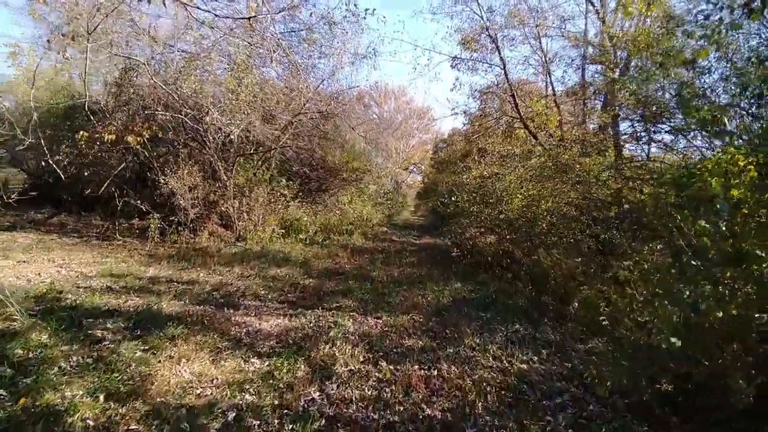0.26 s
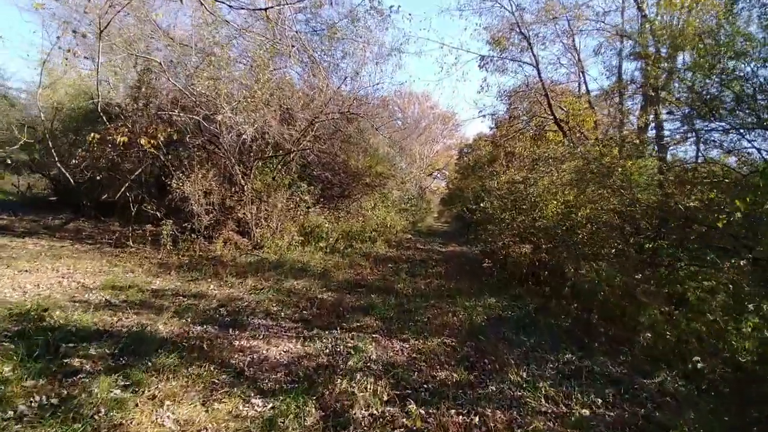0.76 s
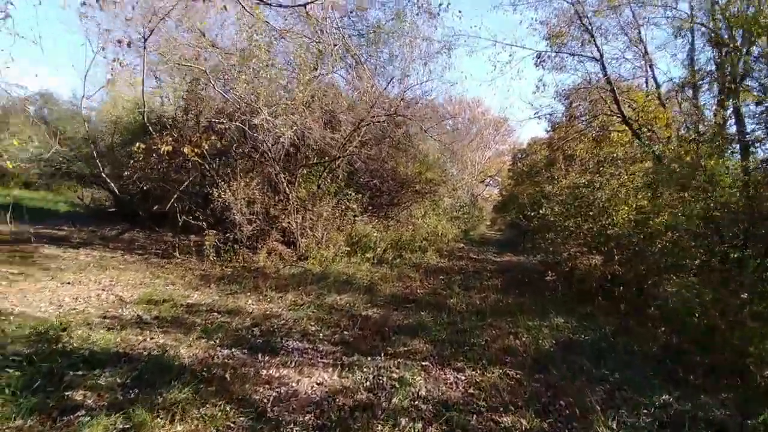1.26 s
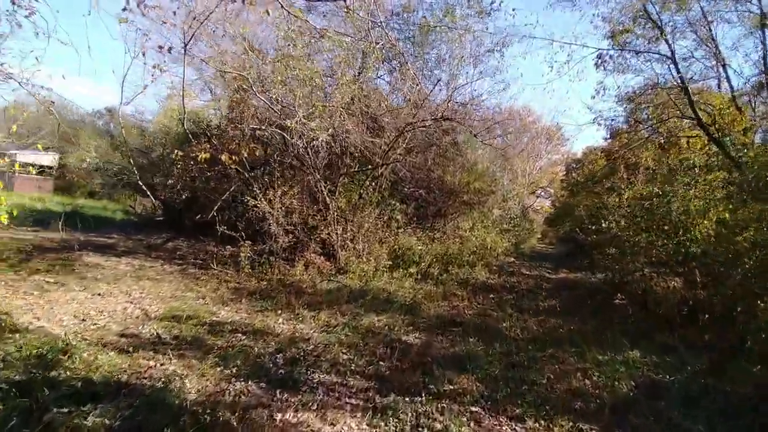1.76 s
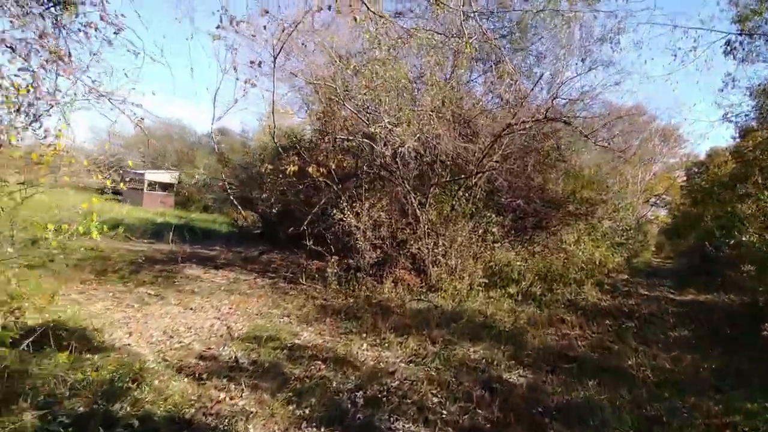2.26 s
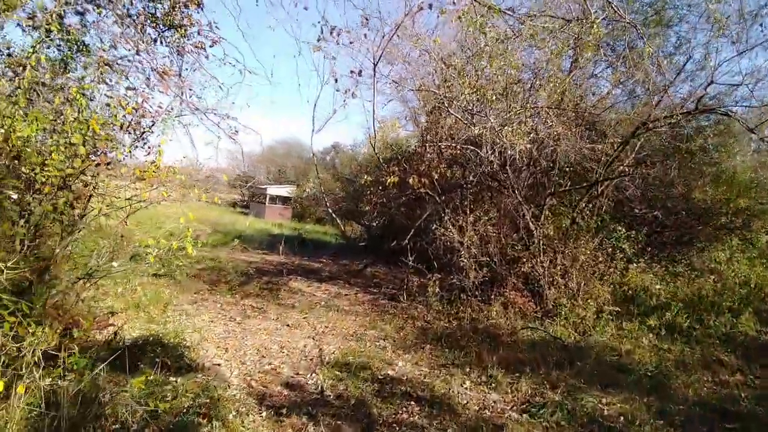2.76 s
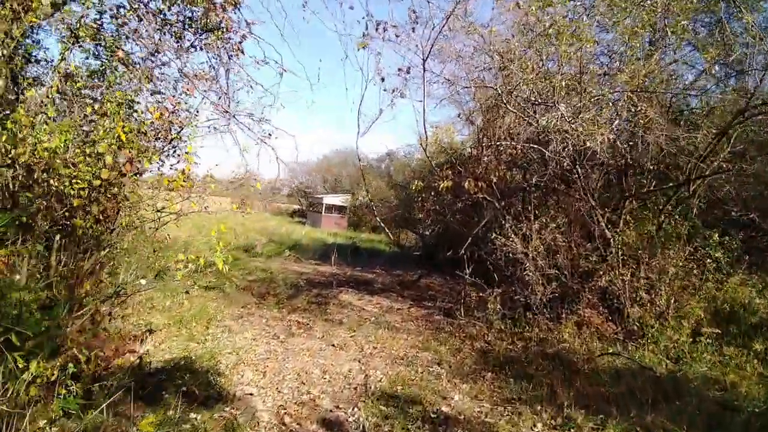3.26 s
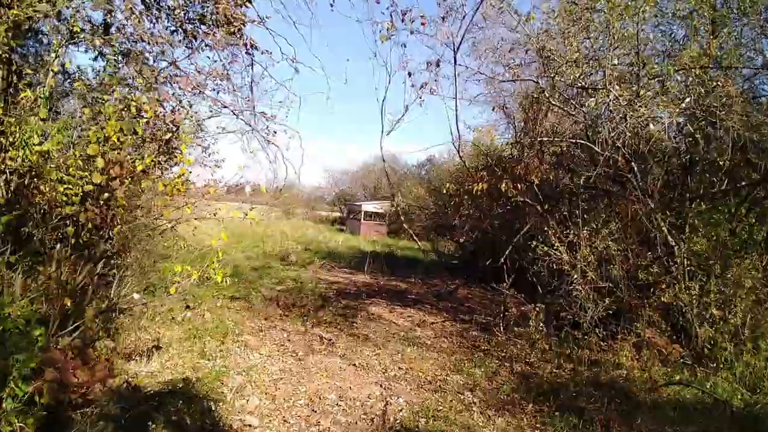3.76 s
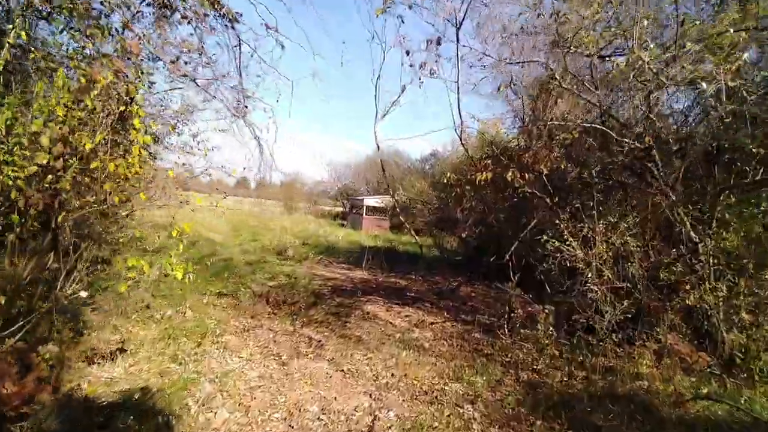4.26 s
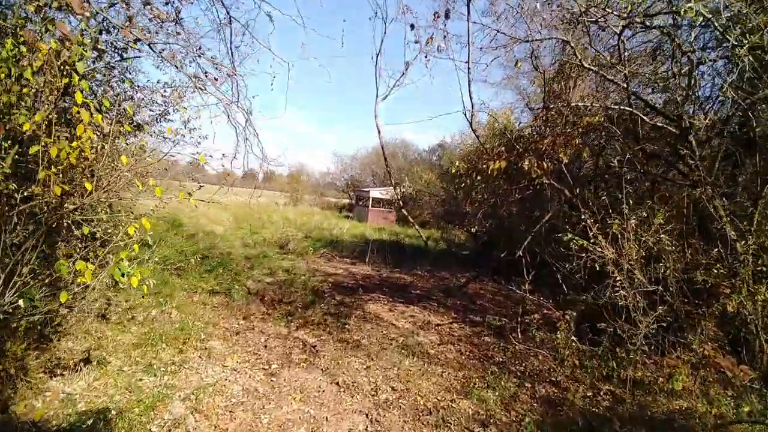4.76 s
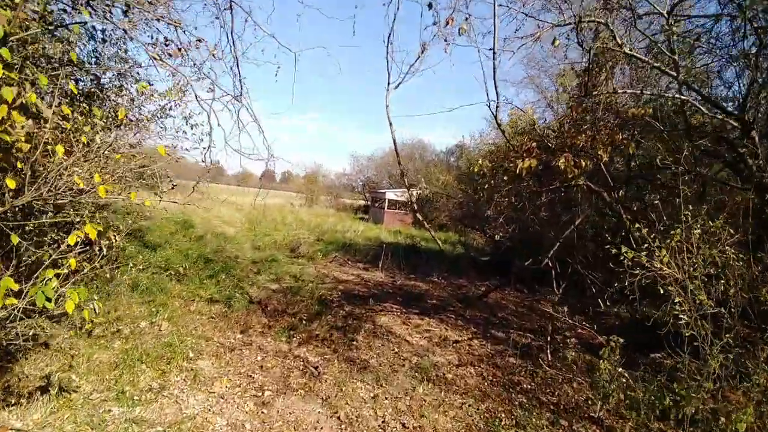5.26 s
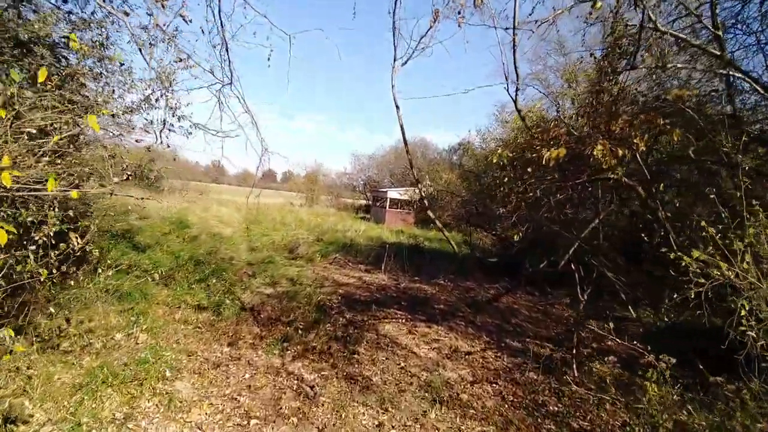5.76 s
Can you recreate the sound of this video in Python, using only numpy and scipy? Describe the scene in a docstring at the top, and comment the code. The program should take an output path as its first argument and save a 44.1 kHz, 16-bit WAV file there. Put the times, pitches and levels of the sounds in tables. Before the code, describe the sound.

Footsteps crunch steadily through dry fallen leaves on an outdoor trail, with small stems snapping over a faint breeze.

```python
"""Footsteps crunch through dry fallen leaves on an outdoor trail, about ten steps.
Each foot presses the soil, scuffs the litter and breaks countless leaves, each with a tiny click.
Now and then a stem snaps, and the soft ground takes the walker's weight with a dull thud.
A light breeze rumbles on the two microphone openings (ports), over very quiet open air."""
import sys
import numpy as np
from scipy import signal
from scipy.fft import rfft, irfft, next_fast_len
from scipy.io import wavfile

SR = 44100
rng = np.random.default_rng(int(sys.argv[2]) if len(sys.argv) > 2 else 0)


def store_pcm(level_fs):
    """Save levels as 16-bit WAV."""
    pcm = np.round(np.clip(level_fs, -1, 1) * 32767).astype(np.int16)
    wavfile.write(sys.argv[1], SR, np.atleast_2d(pcm).T)


N = 264597

# Levels in the tables are relative: the functions add their own gains.
# each step presses twice, heel then forefoot:
# start_s, attack_s, hold_s, release_s, leaves_db, sole_db, soil_db
FOOT_PRESSES = [(-0.02, .02, .01, 0.36, -39.5, -53, -59), (0.145, .04, 0.054, 0.1053, -38.3, -56.5, -59.5),
                (0.478, .125, .012, .125, -30, -44, -50), (0.682, .03, .027, 0.0458, -32.5, -44.5, -48.5),
                (1.08, .03, .05, 0.2, -45.5, -57.5, -66.5), (1.215, .09, .05, .07, -39.5, -54.5, -53.5),
                (1.53, .095, .04, .08, -39.5, -46.5, -52.5), (1.702, .028, .06, 0.16, -32, -42, -47.5),
                (2.304, .018, .032, 0.1449, -35.5, -47.5, -56),
                (2.402, .035, .005, 0.1462, -36.5, -56, -57), (2.868, .09, .02, 0.25, -41.5, -54.5, -58),
                (2.991, .028, .02, 0.08, -37, -60, -55), (3.484, .024, .035, 0.1552, -39.5, -54, -61.5),
                (3.597, .06, .045, 0.1, -39, -51, -56.5), (4.0, .048, 0.095, 0.31, -41, -55.5, -59),
                (4.209, .05, .015, 0.14, -40.5, -55, -54.5), (4.79, .075, .02, 0.08, -37.5, -49, -50.5),
                (4.939, .04, .015, 0.12, -43.5, -57.5, -60.5), (5.39, .11, .03, -0.19, -49, -56, -56),
                (5.525, .045, .005, 0.1, -40.5, -48.5, -54.5)]
# the swinging foot brushes the leaves: start_s, hold_s, leaves_db, sole_db
FOOT_BRUSHES = [(0.306, .135, -56, -64.5), (0.78, .12, -52.5, -64), (1.392, .12, -61, -64),
                (1.883, .02, -45, -60), (1.978, .045, -50.5, -63), (2.1, .07, -63.5, -73.5),
                (2.585, .04, -47.5, -58.5), (2.7, .02, -66, -69), (2.828, .01, -60, -67),
                (3.095, .015, -46.5, -64), (3.215, .055, -52.5, -61), (3.385, .045, -56, -66),
                (3.79, .12, -57, -64.5), (4.331, .025, -43.5, -56.5), (4.422, .085, -46.5, -63),
                (4.649, .1, -61.5, -66), (5.059, .135, -54.5, -65), (5.31, .02, -53, -63),
                (5.68, .045, -57, -62.5)]
# trodden leaves keep ticking until the walker pauses: leaves_db, sole_db, soil_db
TICKING_DB = [-67, -74, -75]
# how brittle the leaves are along the trail: time_s, treble_db
LEAF_CRISPNESS = [(0.0, -2), (0.55, -8.5), (0.72, -5), (1.0, -8), (1.28, -3.5), (1.75, -6.5), (1.93, -0.5),
                  (2.15, -9.5), (3.0, -2.5), (3.3, -16), (3.6, -6), (3.9, -11), (4.1, -2.5), (4.38, -0.5),
                  (4.6, -9), (5.1, -3.5), (5.7, 2.5)]
# tone of crushed leaves: frequency_hz, level_db
LITTER_TONE = [(170, -23.5), (290, -24.5), (430, -10.5), (580, -11), (950, -11), (2000, -13), (3100, -10),
               (4200, -2.5), (6400, 1.5), (8000, 2), (10500, -8), (13700, -16.5), (14800, -9),
               (15800, -10.5)]
# stems and stiff leaves that snap: time_s, level_db, pitch_hz, settle_s
STEM_SNAPS = [(0.01, -11, 6160, .007), (0.248, -12, 7650, 0.005), (0.2621, -22.5, 8600, 0.0056),
              (0.2745, -20, 8060, 0.0068), (0.443, -33.5, 8800, 0.008), (1.089, -38, 6240, .012),
              (1.106, -29, 3540, .015), (1.28, -23.5, 9300, .006), (1.305, -16, 8750, .006),
              (1.3735, -19, 7200, 0.0041), (1.722, -15, 6240, 0.0051), (2.0468, -31.5, 3600, .007),
              (2.1096, -26, 8100, .006), (2.158, -43, 1910, 0.0073), (2.4432, -15, 8050, .006),
              (2.505, -23, 9400, .006), (2.5453, -24.5, 9500, 0.0065), (2.7818, -41.5, 1680, 0.0045),
              (2.782, -35, 6030, 0.0045), (2.894, -23, 7850, 0.01), (3.0485, -18.5, 7000, .006),
              (3.102, -36.5, 7000, .005), (3.1193, -19.5, 8500, 0.005), (3.1662, -32, 8300, .006),
              (3.232, -31.5, 5500, 0.015), (3.2612, -27.5, 6650, 0.0075), (3.322, -39.5, 2250, .006),
              (3.364, -30, 4740, 0.042), (3.7072, -19, 8000, 0.0052), (3.8639, -28, 7540, .006),
              (3.9047, -34, 7600, .004), (3.9954, -29, 5100, 0.021), (4.163, -22, 10000, .006),
              (4.3066, -21, 7400, 0.0055), (4.355, -20, 8450, .006), (4.38, -22, 9500, .006),
              (4.615, -42, 11300, 0.0053), (4.9902, -20, 8900, .006), (5.336, -35, 5970, .012),
              (5.407, -32.5, 2920, 0.012), (5.708, -35, 1860, .013), (5.709, -29, 6600, .007),
              (5.7471, -34, 8520, .006), (5.793, -37, 1485, 0.0053), (5.927, -44, 10370, .006),
              (5.931, -51, 1220, 0.014)]
# the weight comes down on the ground: start_s, level_db
GROUND_THUDS = [(0.185, -60), (0.695, -59), (1.343, -55), (1.795, -63), (3.018, -56), (3.689, -64),
                (4.12, -54.5), (4.264, -60), (4.675, -71),         (4.83, -46), (4.879, -55.5),
                (5.521, -54.5)]
# a light breeze that drops as the path turns: time_s, level_db
BREEZE_LEVEL = [(0.0, -78), (1.0, -82), (1.8, -79), (3.0, -87.5), (6.0, -88.5)]
# gusts on the ports: peak_time_s, level_db, width_s
BREEZE_GUSTS = [(0.1, -58.5, .035), (0.23, -65.5, .06), (0.68, -60.5, 0.055), (1.2, -77.5, 0.11),
                (1.86, -66.5, .05), (2.01, -71, 0.025), (2.42, -70, 0.066), (4.86, -79, 0.037),
                (5.52, -74.5, .04)]
# tone of buffeting air: frequency_hz, level_db
BREEZE_TONE = [(20, -42), (45, -8), (75, -2), (110, 2.5), (150, -13.5), (260, -23)]
# tone of distant open air: frequency_hz, level_db
AIR_TONE = [(30, -46), (70, -10), (118, 1), (160, -1.5), (500, -7.5), (1000, -6.5), (2000, -16),
            (3200, -8.5), (7000, -11.5), (15800, -27)]
# how much louder the left port is: frequency_hz, left_minus_right_db
PORT_BALANCE = [(70, 10.3), (200, 0), (650, 0.0), (1000, 3.3), (1450, 2.8), (1950, 9.3), (2400, 1.6),
                (3000, 0.9), (5200, -0.5), (7000, 3.9), (8500, 7.5), (10500, 8.8), (13600, 5.7),
                (14800, 7.7)]
# how alike the two ports sound: frequency_hz, likeness (0 to 1)
PORT_LIKENESS = [(60, .2), (200, 0.66), (550, 1), (1150, 0.49), (1900, 0.67), (2400, 0.26), (3150, 0.93),
                 (3650, 0.64), (4400, 0.74), (6500, 0.78), (9000, 0.14), (12000, 0.3), (15000, .12)]

FFT_SIZE = next_fast_len(N + 2048, real=True)
HZ = np.maximum(np.arange(FFT_SIZE // 2 + 1) * SR / FFT_SIZE, 1)
TIME_S = np.arange(N) / SR


def footsteps():
    """The sole crushes leaves, drags through them and packs the soil underneath."""
    leaves_db, sole_db, soil_db = gait()
    crisp_db = over_time(LEAF_CRISPNESS)
    # full weight breaks leaves by the thousand; between steps fewer break, still a few hundred a second, a soft
    # swish
    crush = from_db(.6 * (leaves_db - leaves_db.mean()))
    litter = at_ports(rng.standard_normal((2, N))) * from_db(over_hz(LITTER_TONE))
    breaks = tiny_breaks(crush, per_s=600, spread_db=3.5, ring_s=.0019, clump_db=1.94)
    soil = crackle(litter, crush, breaks, low_hz=162, high_hz=1340, bands=3, per_s=200,
                   spread_db=2.5, ring_s=.004, together=.15, hiss=.34, patchy_db=1.5)
    scuff = crackle(litter, crush, breaks, low_hz=1390, high_hz=3110, bands=3, per_s=280,
                    spread_db=2, ring_s=.0028, together=.33, hiss=.22, patchy_db=2.5)
    leaves = crackle(litter, crush, breaks, low_hz=3250, high_hz=9640, bands=4, per_s=420,
                     spread_db=3.5, ring_s=.0021, together=.55, hiss=.1, patchy_db=2.5)
    brittle = crackle(litter, crush, breaks, low_hz=10490, high_hz=14860, bands=2, per_s=530,
                      spread_db=2.5, ring_s=.0009, together=.42, hiss=.17, patchy_db=1.5)
    crunch = (soil * from_db(soil_db - 2) + scuff * from_db(sole_db + .77)
              + leaves * from_db(leaves_db - 1.8) + brittle * from_db(leaves_db + crisp_db - 1.9))
    return add_body_echo(crunch, echo_db=-10, delay_s=.0035, sway=.122)


def gait(pause_s=5.78, fade_s=.18):
    """Presses, brushes and ticking add up to three loudness curves in dB: leaves, sole and soil."""
    contacts = [(foot_contact(*row[:4]), row[4:]) for row in FOOT_PRESSES]
    for start_s, hold_s, leaves_db, sole_db in FOOT_BRUSHES:
        brush = foot_contact(start_s, attack_s=.03, hold_s=hold_s, release_s=.09)
        soil_db = sole_db - 5
        contacts.append((brush, (leaves_db, sole_db, soil_db)))
    ticking = from_db(-20 * np.maximum(TIME_S - pause_s, 0) / fade_s)
    contacts.append((ticking, TICKING_DB))
    gains, levels_db = zip(*contacts)
    power = from_db(levels_db).T ** 2 @ np.array(gains) ** 2
    return 10 * np.log10(power + 1e-12)


def foot_contact(start_s, attack_s, hold_s, release_s):
    """The weight comes on slowly at first and stays; the crunch lingers, then stops short."""
    age_s, attack_s = TIME_S - start_s, max(attack_s, 1e-3)
    pressed = np.clip(age_s / attack_s, 0, 1)
    released = np.clip((age_s - attack_s - hold_s) / max(release_s, 1e-3), 0, 4)
    return pressed ** 1.2 * from_db(-20 * released ** 1.5)


def tiny_breaks(crush, per_s, spread_db, ring_s, clump_db):
    """The power of brief, uneven breaks that come in clusters; a harder crush multiplies their rate."""
    chance = per_s / SR * crush * flutter(clump_db, rate_hz=45)
    starts = np.flatnonzero(rng.random(N) < chance)
    size_db = spread_db * np.minimum(rng.exponential(1, len(starts)), 3.2)
    clicks = np.full(N, 1e-18)
    clicks[starts] = from_db(size_db) ** 2 / crush[starts]  # denser, but no louder overall
    power = signal.lfilter([1], [1, -np.exp(-2 / (ring_s * SR))], clicks)
    return power / power.mean()


def crackle(litter, crush, shared_breaks, low_hz, high_hz, bands, per_s,
            spread_db, ring_s, together, hiss, patchy_db):
    """Some breaks sound in all frequency bands together, some in one only; the finest merge into hiss."""
    edges_hz = np.geomspace(low_hz, high_hz, bands + 1)
    out = np.zeros((2, N))
    for low, high in zip(edges_hz, edges_hz[1:]):
        own_breaks = tiny_breaks(crush, per_s, spread_db, ring_s, clump_db=2.5)
        breaks = together * shared_breaks + (1 - together) * own_breaks
        patch = flutter(patchy_db, rate_hz=13.6)  # each patch of leaves has its own tone
        out += to_sound(litter * band(low, high)) * patch * np.sqrt(hiss + (1 - hiss) * breaks)
    return out / rms(out)


def add_body_echo(crunch, echo_db, delay_s, sway):
    """The crunch bounces off the moving legs and body, so the echo's delay keeps changing."""
    now = np.arange(N)
    stretch = np.exp(sway * drift(rate_hz=1.52))
    earlier = now - delay_s * SR * np.interp(now / 20, np.arange(len(stretch)), stretch)
    echo = np.array([np.interp(earlier, now, side) for side in crunch])
    return crunch + from_db(echo_db) * echo


def snapping_stems(gain_db, tear_s, ring_cycles, ring_db, splinter_db, half_width_octaves):
    """A stem gives way with a crack, rings briefly at its own pitch, and its splinters settle."""
    out = np.zeros((2, FFT_SIZE))
    t = np.arange(2048) / SR
    torn = np.minimum(t / tear_s, 1) ** 2  # the first fibres go just before the whole stem
    width = 2 ** half_width_octaves
    for time_s, level_db, pitch_hz, settle_s in STEM_SNAPS:
        dying = np.exp(-np.maximum(t - tear_s, 0) * pitch_hz / ring_cycles)
        splinters = from_db(splinter_db) * np.exp(-t / settle_s)
        fibres = rng.choice([-1, 1], (2, len(t))) * torn * (dying + splinters)
        around_pitch = signal.butter(1, [pitch_hz / width, pitch_hz * width], "band", fs=SR)
        crack = signal.lfilter(*around_pitch, fibres)
        crack /= np.abs(crack).max(axis=1, keepdims=True)
        ring = torn * dying * np.sin(2 * np.pi * pitch_hz * t)
        crack[0] += from_db(ring_db) * ring  # row 0 is the part both ports share
        start = max(round((time_s - tear_s) * SR), 0)
        out[:, start:start + len(t)] += crack * from_db(level_db + gain_db)
    return to_sound(at_ports(out))


def ground_thuds(gain_db, rise_s, low_hz, high_hz):
    """Soft ground takes the weight with a dull, cushioned push."""
    force = np.zeros(N)
    for start_s, level_db in GROUND_THUDS:
        age = np.maximum(TIME_S - start_s, 0) / rise_s
        force += from_db(level_db) * age * np.exp(1 - np.minimum(age, 20))
    ground = to_sound(at_ports(rng.standard_normal((2, N))) * band(low_hz, high_hz))
    return ground / rms(ground) * force * from_db(gain_db)


def breeze(gain_db, lumps_db):
    """Moving air buffets each port separately: a lumpy low rumble, stronger on the left."""
    power = from_db(over_time(BREEZE_LEVEL)) ** 2
    for peak_time_s, level_db, width_s in BREEZE_GUSTS:
        from_peak = np.clip((TIME_S - peak_time_s) / width_s, -20, 20)
        power += (from_db(level_db) / np.cosh(from_peak)) ** 2
    noise = rfft(rng.standard_normal((2, N)), FFT_SIZE)
    rumble = to_sound(noise * from_db(over_hz(BREEZE_TONE)) * band(12, 310))
    rumble *= flutter(lumps_db, rate_hz=10) * from_db([[0], [-11]])  # left, right
    return rumble / rms(rumble.mean(axis=0)) * np.sqrt(power) * from_db(gain_db)


def open_air(level_db):
    """A faint, even hush with a low drone far away."""
    air = to_sound(at_ports(rng.standard_normal((2, N))) * from_db(over_hz(AIR_TONE)))
    return air / rms(air.mean(axis=0)) * from_db(level_db)


def at_ports(pair, right_lag_s=.000488, echo_s=.000482, echo_db=-20):
    """Two unrelated signals become left and right spectra: partly alike, each with its own tone."""
    common, apart = rfft(pair, FFT_SIZE)
    likeness = over_hz(PORT_LIKENESS)
    common *= np.sqrt((1 + likeness) / 2)
    apart *= np.sqrt((1 - likeness) / 2)
    lean = from_db(over_hz(PORT_BALANCE) / 2)
    left = (common + apart) * lean
    right = (common - apart) / lean * np.exp(-2j * np.pi * HZ * right_lag_s)
    # a very short echo off the case around the ports ripples the tone
    ripple = 1 + from_db(echo_db) * np.exp(-2j * np.pi * HZ * echo_s)
    return ripple * np.array([left, right])


def flutter(depth_db, rate_hz):
    """A volume that wanders by chance."""
    return np.repeat(from_db(depth_db * drift(rate_hz)), 20)[:N]


def drift(rate_hz):
    """A smooth random wobble of typical size one, with a value for every 20 samples."""
    memory = np.exp(-2 * np.pi * rate_hz * 20 / SR)
    noise = rng.standard_normal(N // 20 + 2002)
    slow = signal.lfilter([1], [1, -2 * memory, memory ** 2], noise)[2000:]
    return slow / rms(slow)


def band(low_hz, high_hz):
    """A steep filter that keeps what lies between two frequencies."""
    return 1 / np.sqrt((1 + (low_hz / HZ) ** 16) * (1 + (HZ / high_hz) ** 16))


def over_time(table):
    """A table's value at every sample."""
    time_s, value = np.transpose(sorted(table))
    return np.interp(TIME_S, time_s, value)


def over_hz(table):
    """A table's value at every frequency."""
    hz, value = np.transpose(table)
    return np.interp(np.log(HZ), np.log(hz), value)


def to_sound(spectra):
    """Left and right spectra turned into samples."""
    return irfft(spectra, FFT_SIZE)[:, :N]


def from_db(db):
    """Decibels turned into a volume factor."""
    return 10 ** (np.asarray(db) / 20)


def rms(x):
    """A signal's typical size (root mean square)."""
    return np.sqrt(np.mean(x ** 2) + 1e-20)


def scene():
    """Steps, snapping stems and thuds over breeze and open air."""
    stems = snapping_stems(gain_db=-6, tear_s=.002, ring_cycles=4.4, ring_db=-8.5,
                           splinter_db=-9.5, half_width_octaves=.32)
    thuds = ground_thuds(gain_db=-7.5, rise_s=.011, low_hz=130, high_hz=460)
    return footsteps() + stems + thuds + breeze(gain_db=.3, lumps_db=.5) + open_air(level_db=-72)


def record(dry):
    """The highest treble is cut steeply, at about 15900 Hz."""
    treble_cut = np.interp(HZ, [15800, 16000], [1, 0])
    return to_sound(rfft(dry, FFT_SIZE) * treble_cut)


dry = scene()
out = record(dry)
store_pcm(out)
```